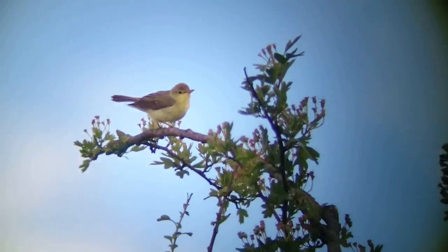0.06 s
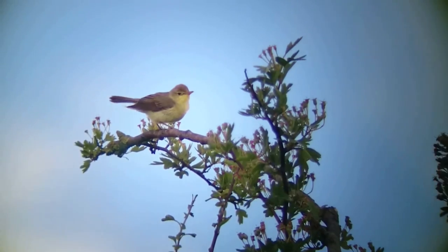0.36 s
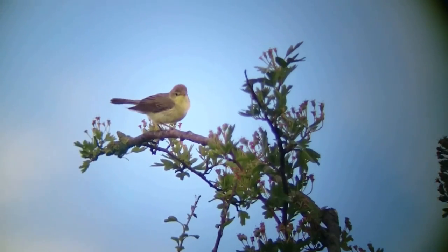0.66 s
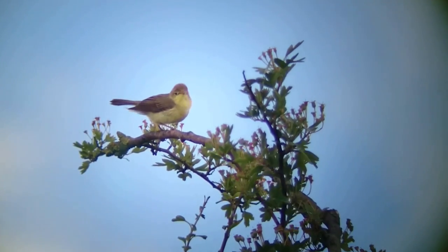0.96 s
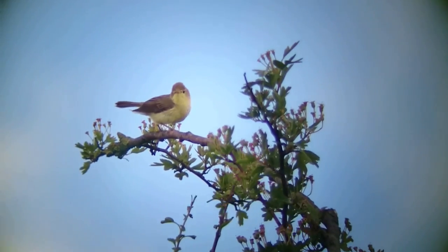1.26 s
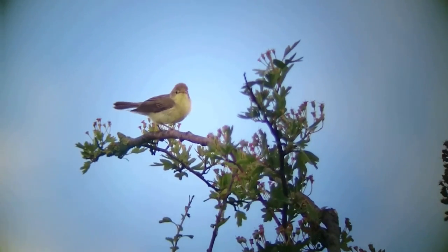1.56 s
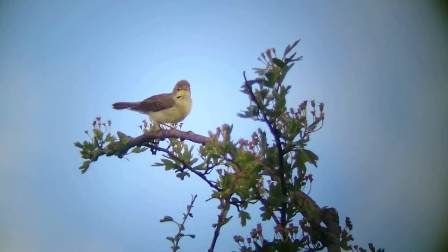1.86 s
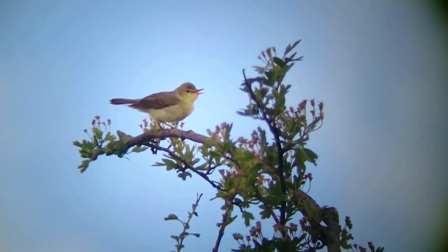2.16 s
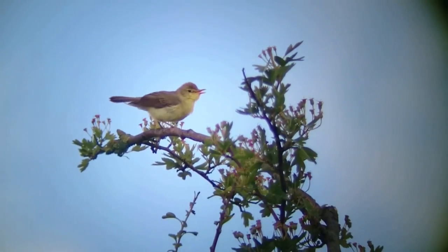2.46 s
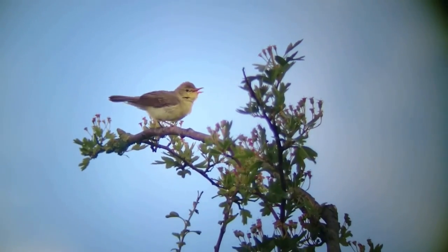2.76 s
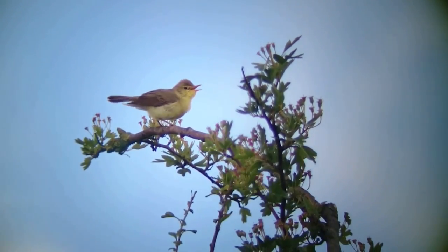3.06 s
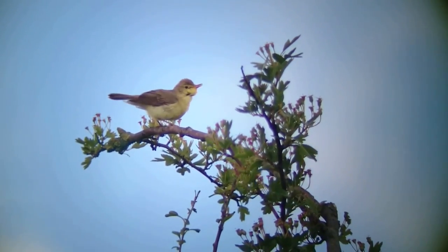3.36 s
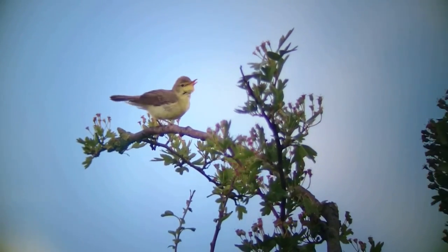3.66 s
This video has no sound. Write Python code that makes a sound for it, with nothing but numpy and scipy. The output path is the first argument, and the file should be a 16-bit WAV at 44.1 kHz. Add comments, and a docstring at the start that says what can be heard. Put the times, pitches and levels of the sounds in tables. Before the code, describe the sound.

Gusty wind rumbles on the microphone while a small bird sings faintly in open country.

```python
"""A small warbler on a bush in open country, heard through a camera's two microphone ports.
From the start, gusts buffet each port separately, brighter as they grow, over a faint hush of
land and leaves. At 0.16 s the housing clicks sharply near the right port. From 1 s the wind eases
and the bird sings softly. At 2.2 s the housing clicks again and the gusts return; the song goes on
in chips and buzzes, with arched calls at 3.2 and 3.4 s."""
import sys
import numpy as np
from scipy import signal
from scipy.fft import rfft, irfft, next_fast_len
from scipy.io import wavfile
from scipy.ndimage import uniform_filter1d, map_coordinates

SR = 44100
rng = np.random.default_rng(int(sys.argv[2]) if len(sys.argv) > 2 else 0)


def file_out(sig):
    """Save sig as 16-bit WAV at sys.argv[1]."""
    # one column per channel
    cols = np.atleast_2d(sig).T
    # limit, then scale
    lim = np.clip(cols, -1, 1)
    pcm = np.round(lim * 32767).astype(np.int16)
    wavfile.write(sys.argv[1], SR, pcm)


N = 167580

# wind strength per port: time_s, level_db
GUSTS_LEFT = [(0.03, -26), (0.12, -20.5), (0.36, -29), (0.42, -18.5), (0.74, -29), (0.78, -23), (1.02, -28),
              (1.06, -41), (1.142, -22.5), (1.4, -41), (1.46, -34), (1.84, -47), (2.45, -15.5),
              (2.53, -24.5), (2.709, -19), (2.769, -26.5), (2.93, -18), (3.01, -26.5), (3.41, -32),
              (3.61, -45), (3.65, -33), (3.8, -49)]
GUSTS_RIGHT = [(0.0, -20.5), (0.38, -24), (0.46, -26.5), (0.621, -18.5), (0.776, -23.5), (0.811, -23.5),
               (0.96, -41.5), (0.998, -25), (1.28, -39.5), (1.42, -60), (1.481, -36), (1.7, -63),
               (1.778, -27), (1.937, -49), (1.976, -27.5), (2.077, -38), (2.18, -16), (2.37, -22),
               (2.591, -17), (3.13, -31.5), (3.25, -27), (3.41, -41), (3.51, -31.5), (3.8, -31.5)]
# turbulence spectra: freq_hz, gain_db
RUMBLE_SPECTRUM = [(20, -37), (35, -16), (56, 3), (88, 4.5), (130, -7), (200, -14), (300, -28.5),
                   (500, -52.5), (1000, -79), (2000, -120)]
FLUTTER_SPECTRUM = [(40, -15), (110, 4), (200, 5), (320, -2.5), (500, -16), (800, -29), (1300, -46.5),
                    (3000, -89)]
# spectra of distant land, port hiss and leaves: freq_hz, gain_db
HUSH_SPECTRUM_LEFT = [(30, -9), (250, 2), (550, -5), (900, 2.5), (1350, -1.5), (1680, 4.5), (1950, -24.5),
                      (3000, -13.5), (6000, -22), (16000, -46.5)]
HUSH_SPECTRUM_RIGHT = [(30, 6.5), (250, -7.5), (550, -5), (800, 0), (1300, -6.5), (2200, -12.5),
                       (3500, -19.5), (6500, -22), (16000, -44)]
HISS_SPECTRUM_LEFT = [(300, 2.5), (1650, -4.5), (2100, 2.5), (3500, -0.5), (4600, -3), (5800, -9),
                      (7500, -5.5), (11000, -14), (16000, -14.5)]
HISS_SPECTRUM_RIGHT = [(300, -1), (2000, 1), (3500, 1), (5000, -14), (6500, 2), (8000, -4.5),
                       (11000, -12.5), (16000, -18)]
LEAF_SPECTRUM = [(1500, -23), (4000, 0), (7000, -0.5), (12000, -4), (16000, -10)]
# swell of land and leaves: time_s, level_db
HUSH_LEVELS = [(0, -68.5), (0.9, -65), (1.71, -70.5), (2.66, -61), (3.8, -66)]
LEAF_LEVELS = [(0, -74), (.12, -78), (.19, -66.5), (.4, -70), (.6, -82.5), (.9, -83), (1.08, -68),
               (1.3, -71.5), (1.52, -85), (2.15, -95.5), (2.22, -72.5), (2.45, -68.5), (2.7, -83),
               (3.1, -82), (3.45, -71.5), (3.8, -78)]
# eddies striking a port: centre_s, width_s, level_db, port (0 left, 1 right)
HARD_EDDIES = [(.149, 0.00069, -7, 0), (0.27, 0.0014, -13, 0), (0.28, 0.00092, -12.5, 1),
               (0.378, 0.0011, -5.5, 1), (0.439, 0.0014, -12.5, 0), (0.508, 0.00076, -16.5, 0),
               (.558, 0.001, -5.5, 1), (.619, 0.0011, -6.5, 1), (.63, .0011, -4.5, 1),
               (0.636, 0.00061, -14.5, 0), (0.655, 0.0017, 4.5, 1), (0.683, 0.0009, -7.5, 0),
               (0.715, 0.00084, -2.5, 1), (0.7259, 0.0029, 5.5, 1), (0.743, 0.0037, 2, 1),
               (0.733, 0.0012, -3.5, 0), (0.773, 0.00065, -28, 1), (.793, 0.00091, -8.5, 1),
               (0.862, 0.00092, -11, 0), (0.991, 0.001, -12.5, 0), (1.135, 0.002, -8.5, 0),
               (1.238, 0.001, -16.5, 0), (1.408, 0.00092, -33.5, 0), (1.474, 0.00086, -28, 1),
               (1.757, 0.00055, -24, 1), (1.781, 0.0017, -8.5, 1), (2.167, 0.00044, -18, 1),
               (2.175, 0.00081, -7, 1), (2.23, 0.00065, -8.5, 1), (2.238, 0.0031, 7, 1),
               (2.302, 0.0012, 2, 1), (2.378, 0.00075, -9, 0), (2.435, 0.00042, -19, 0),
               (2.461, 0.00054, -12.5, 0), (2.47, 0.00036, -10.5, 0), (2.478, 0.00054, -13, 0),
               (2.595, 0.00099, -2.5, 0), (2.632, 0.0007, -7, 1), (2.667, 0.00062, -12.5, 0),
               (2.704, 0.00066, -12.5, 0), (2.77, 0.00076, -17.5, 0), (2.83, .0011, -15, 0),
               (2.86, 0.0009, -4.5, 1), (2.912, 0.00048, -12, 0), (2.935, 0.00083, -5, 0),
               (2.944, 0.00069, -10.5, 0), (3.052, 0.001, -14, 0), (3.155, 0.001, -16, 0),
               (3.236, 0.0017, -9, 1), (3.251, 0.00095, -21, 0), (3.271, 0.0035, -3, 1),
               (3.514, 0.0015, -9.5, 1), (3.681, 0.001, -21, 0), (3.739, 0.00084, -15, 1)]
# housing clicks, the first with a rebound: start_s, ring_db, low_mode_gain_db, edge_db
HOUSING_CLICKS = [(0.1573, -22, -13, -9), (0.159, -34, 6, -40), (2.1915, -22.5, 1, -38)]
# housing resonances: freq_hz, left_db, right_db, t60_s
HOUSING_MODES = [(1790, -25.5, -33, 0.019), (2820, -37, -13, 0.0043), (3500, -27, -13.5, 0.0043),
                 (4460, -29, -35, 0.017), (6590, -39.5, -1.5, 0.0026), (7300, -40, -47, 0.00076),
                 (13600, -42.5, -2, 0.001), (14900, -39.5, -7, .0018)]
# spectra of the click's hard edge and of its tail and scuff: freq_hz, gain_db
EDGE_SPECTRUM = [(1500, -28), (4500, -22.5), (6300, -18), (8300, -3), (10000, -7.5), (11300, -4),
                 (12500, -10), (14000, -10), (16000, -12)]
SCUFF_SPECTRUM = [(3000, -21.5), (5200, -7), (6500, 0.5), (9000, -4.5), (12500, -7.5), (16000, -3)]
# scuff after the second click: time_s, level_db
SCUFF_LEVELS = [(2.195, -61), (2.235, -61.5), (2.25, -54.5), (2.275, -90)]
# song: start_s, length_s, start_hz, middle_hz, end_hz, level_db, buzz (0 pure, 1 rough)
SONG_NOTES = [(1.02, 0.25, 4670, 4500, 4480, -75, .45), (1.161, 0.09, 6900, 6730, 6360, -81, 0.31),
              (1.266, 0.118, 4620, 4540, 4430, -74.5, .35), (1.384, 0.075, 4720, 4620, 4380, -72.5, 0.88),
              (1.335, 0.065, 6600, 6270, 6080, -76, .4), (1.73, 0.053, 3770, 3450, 3450, -76, 0.46),
              (2.327, 0.027, 3760, 3760, 3800, -70, 0.042), (2.32, .03, 4980, 5000, 5000, -68, .1),
              (2.373, 0.055, 3800, 3750, 3960, -70.5, 0.1), (2.427, 0.034, 3800, 3770, 3750, -68.5, .1),
              (2.38, 0.08, 3100, 3040, 3090, -75.5, 0.44), (2.497, .025, 4400, 4450, 4700, -68, 0.8),
              (2.562, .065, 6720, 6450, 6320, -77.5, 0.4), (2.725, 0.099, 7070, 6350, 6100, -73, 0.6),
              (2.742, 0.024, 3790, 3800, 3800, -71, 0), (2.738, .025, 5000, 5000, 5000, -69, 0),
              (2.785, 0.095, 3900, 4120, 4110, -71, 0.79), (2.791, .08, 3100, 3130, 3330, -74, 0.087),
              (2.901, .011, 5800, 6440, 7140, -65.5, 0.1), (2.912, 0.012, 4130, 5410, 4640, -49.5, 0.71),
              (2.956, 0.0075, 5800, 6080, 7100, -60.5, 0.062),
              (2.965, 0.0096, 4200, 5350, 4970, -52.5, 0.65), (3.021, .016, 6100, 5300, 4560, -69, 0.004),
              (3.023, 0.095, 4450, 3960, 3450, -66.5, 1), (3.154, 0.027, 4500, 4230, 4000, -70.5, 1),
              (3.197, 0.022, 4370, 4830, 4240, -57.5, 0.45), (3.359, 0.018, 4500, 4800, 4450, -54, 0.25),
              (3.36, 0.015, 6100, 6300, 6100, -64.5, 0.7), (3.399, 0.025, 4600, 4840, 4470, -54.5, 0.3),
              (3.402, 0.031, 6060, 6300, 5970, -68, 1), (3.509, 0.0186, 4100, 3480, 3380, -67, 0.6),
              (3.709, 0.11, 2200, 2500, 3520, -83.5, 0.18)]
# falling runs of chips: start_s, count, first_hz, level_db
CHIP_RUNS = [(2.109, 4, 2950, -70), (2.536, 5, 3100, -66.5)]
# arched calls: start_s, level_db
ARCH_CALLS = [(3.229, -51), (3.43, -48.5)]
# course of one arched call: time_s, pitch_hz, level_db, buzz
ARCH_CONTOUR = [(0, 4350, -7, 0.65), (.008, 4780, -4.5, 0.4), (.027, 5400, -1, .5), (.034, 6290, -12, .2),
                (.038, 6950, -16, 0.3), (.046, 7600, -19, 0.4), (.051, 7180, -15, .7),
                (0.055, 6600, -3.5, 0.3), (.061, 5850, 0, .2), (0.077, 4860, -6, .2), (.083, 4400, -28, .2)]
# each port's colouring of the song: freq_hz, gain_db
SONG_RESPONSE_LEFT = [(2000, 14), (3100, -14), (3900, 7.5), (4900, -2.5), (5600, -12.5), (6500, -16.5),
                      (9000, -15)]
SONG_RESPONSE_RIGHT = [(2000, 21), (3100, 6.5), (3900, 0.5), (4900, -22), (5600, -1.5), (6500, 6),
                       (9000, -8)]


def amp(db):
    """Decibels to gain."""
    return 10 ** (np.asarray(db) / 20)


def unit(x):
    """Scale to rms 1."""
    return x / np.sqrt(np.mean(x ** 2) + 1e-20)


def curve(rows, outside=None):
    """One value per sample from (time_s, value) rows."""
    return np.interp(np.arange(N) / SR, *np.transpose(rows), left=outside, right=outside)


def wobble(knots_per_s):
    """Smooth random curve."""
    return map_coordinates(rng.standard_normal(8192), [np.arange(N) * knots_per_s / SR], mode="wrap")


def filtered(x, response):
    """Apply response(hz) to x."""
    size = next_fast_len(N + 8192)
    return irfft(rfft(x, size) * response(np.fft.rfftfreq(size, 1 / SR)), size)[..., :N]


def coloured(x, spectrum):
    """Filter by (freq_hz, gain_db) rows on a log frequency axis."""
    freq_hz, gain_db = np.transpose(spectrum)
    return filtered(x, lambda hz: amp(np.interp(np.log(hz + 1), np.log(freq_hz + 1), gain_db)))


def noise(spectrum):
    """Coloured noise, rms 1."""
    return unit(coloured(rng.standard_normal(N), spectrum))


def add(out, start_s, x):
    """Mix x in at start_s."""
    i = round(start_s * SR)
    out[..., i:i + x.shape[-1]] += x[..., :N - i]


def buffet(gusts, rumble_db, flutter_db, growth, rumble_lumps_db, flutter_lumps_db):
    """Turbulence on one port: lumpy rumble, plus flutter that grows faster than the wind."""
    wind_db, lumps = curve(gusts), wobble(29.97)
    rumble = noise(RUMBLE_SPECTRUM)
    running_rms = np.sqrt(np.abs(uniform_filter1d(rumble ** 2, size=2400)) + 1e-6)
    rumble = unit(rumble / running_rms * amp(rumble_lumps_db * lumps))
    flutter = unit(noise(FLUTTER_SPECTRUM) * amp(flutter_lumps_db * (lumps + wobble(110))))
    expanded_db = wind_db.max() + growth * (wind_db - wind_db.max())
    return rumble * amp(wind_db + rumble_db) + flutter * amp(expanded_db + flutter_db)


def wind():
    """Gusts buffet each port separately."""
    left = buffet(GUSTS_LEFT, rumble_db=-4, flutter_db=-9.5, growth=1.644,
                  rumble_lumps_db=4, flutter_lumps_db=3)
    right = buffet(GUSTS_RIGHT, rumble_db=1.5, flutter_db=-12.5, growth=1.9,
                   rumble_lumps_db=3.5, flutter_lumps_db=1.5)
    return np.array([left, right])


def countryside(waver_db=0.04):
    """Far hush, steady port hiss, and a high hiss that swells like stirring leaves."""
    hush = np.array([amp(6) * noise(HUSH_SPECTRUM_LEFT), amp(4) * noise(HUSH_SPECTRUM_RIGHT)])
    hiss = np.array([amp(-68) * noise(HISS_SPECTRUM_LEFT), amp(-67) * noise(HISS_SPECTRUM_RIGHT)])
    leaves = np.array([noise(LEAF_SPECTRUM), noise(LEAF_SPECTRUM)])
    hush_db = curve(HUSH_LEVELS) + waver_db * wobble(4.13)
    return hush * amp(hush_db) + hiss + leaves * amp(curve(LEAF_LEVELS))


def eddy(width_s):
    """Pressure dip of an eddy's core, centred in 50 ms."""
    t = np.linspace(-0.025, 0.025, SR // 20)
    return -np.hanning(len(t)) / np.cosh(t / width_s)


def port_response(hz, ring_hz=930, ring_q=1.77, cut_hz=70.2, cut_q=0.8, subsonic_hz=35):
    """The port's hollow rings and passes little above; its bass roll-off makes a dip rebound."""
    hollow = 1 / (1 - (hz / ring_hz) ** 2 + 1j * hz / ring_hz / ring_q)
    low_cut = -hz ** 2 / (cut_hz ** 2 - hz ** 2 + 1j * hz * cut_hz / cut_q)
    subsonic_cut = hz / (hz - 1j * subsonic_hz)
    return hollow * low_cut * subsonic_cut


def eddies(small_per_s=13, small_gain_db=5.5, min_width_s=0.00053, widen_per_db=0.7):
    """Dips on the ports: hard eddies, and small random ones that sharpen as the wind grows."""
    out, lead_s = np.zeros((2, N)), 0.025
    for centre_s, width_s, level_db, port in HARD_EDDIES:
        add(out[int(port)], centre_s - lead_s, amp(level_db) * eddy(width_s))
    for channel, gusts in zip(out, (GUSTS_LEFT, GUSTS_RIGHT)):
        wind_db = curve(gusts)
        for position, size in rng.random((int(small_per_s * N / SR), 2)):
            local_db = wind_db[int(position * N)]
            width_s = min_width_s * np.exp(widen_per_db * (wind_db.max() - local_db))
            start_s = max(position * N / SR - lead_s, 0)
            add(channel, start_s, size * amp(local_db + small_gain_db) * eddy(width_s))
    return filtered(out, port_response)


def clicks(rise_s=0.00018, low_mode_limit_hz=4000, tail_db=-29.5, tail_t60_s=0.02, edge_left_db=-22):
    """A hard edge rings the housing; a short tail and a scuff reach the right port only."""
    out, edges = np.zeros((2, N)), np.zeros(N)
    t = np.arange(SR // 20) / SR
    attack = 1 - np.exp(-t / rise_s)
    for start_s, ring_db, low_mode_gain_db, edge_db in HOUSING_CLICKS:
        ring = np.zeros((2, len(t)))
        for hz, left_db, right_db, t60_s in HOUSING_MODES:
            envelope = amp(low_mode_gain_db * (hz < low_mode_limit_hz) - 60 * t / t60_s)
            ring += np.outer(amp([left_db, right_db]), envelope * np.sin(2 * np.pi * hz * t))
        ring[1] += amp(tail_db - 60 * t / tail_t60_s) * noise(SCUFF_SPECTRUM)[:len(t)]
        add(out, start_s, 2 * amp(ring_db) * ring * attack)
        edges[round(start_s * SR)] = -amp(edge_db)
    out += np.outer([amp(edge_left_db), 1], coloured(edges, EDGE_SPECTRUM))
    out[1] += noise(SCUFF_SPECTRUM) * amp(curve(SCUFF_LEVELS, outside=-120))
    return out


def glide(pitch_hz, buzz, buzz_hz=301.4, swing_hz=260):
    """Sine of rms 1 on a pitch path, roughened by fast pitch flutter."""
    t = np.arange(len(pitch_hz)) / SR
    flutter = np.sin(2 * np.pi * buzz_hz * t) + wobble(700)[:len(t)]
    cycles = np.cumsum(pitch_hz + buzz * swing_hz * flutter) / SR
    return np.sqrt(2) * np.sin(2 * np.pi * cycles)


def whistle(length_s, start_hz, middle_hz, end_hz, buzz):
    """One note on a parabolic glide."""
    progress = np.linspace(0, 1, int(length_s * SR))
    parabola = np.polyfit([0, 0.5, 1], [start_hz, middle_hz, end_hz], 2)
    return glide(np.polyval(parabola, progress), buzz) * signal.windows.tukey(len(progress), 0.38)


def chip(pitch_hz, length_s=0.016, rise=0.044):
    """Short upward whistle."""
    return whistle(length_s, pitch_hz * (1 - rise), pitch_hz, pitch_hz * (1 + rise), buzz=0.13)


def arched_call(rasp_depth=0.41):
    """A whistle climbs, breaks at the top and swoops down; rasp adds side bands."""
    time_s, *columns = np.transpose(ARCH_CONTOUR)
    t = np.arange(int(time_s[-1] * SR)) / SR
    pitch_hz, level_db, buzz = (np.interp(t, time_s, column) for column in columns)
    tone = glide(pitch_hz, buzz) * amp(level_db)
    rasp = 1 + rasp_depth * wobble(2600)[:len(t)]
    return tone * rasp * signal.windows.tukey(len(t), 0.1)


def bush_scatter(song, t60_s=0.31, wet_db=-12):
    """Bushes add a faint tail to the song, a separate one for each port."""
    t = np.arange(SR // 2) / SR
    tails = rng.standard_normal((2, len(t))) * amp(-60 * t / t60_s)
    return [song + amp(wet_db) * signal.fftconvolve(song, tail / np.linalg.norm(tail))[:N]
            for tail in tails]


def warbler(chip_period_s=0.028, chip_pitch_ratio=0.91, chip_fade_db=5):
    """Notes, arched calls and chip runs, scattered by bushes and coloured by each port."""
    song = np.zeros(N)
    for start_s, length_s, start_hz, middle_hz, end_hz, level_db, buzz in SONG_NOTES:
        add(song, start_s, amp(level_db) * whistle(length_s, start_hz, middle_hz, end_hz, buzz))
    for start_s, level_db in ARCH_CALLS:
        add(song, start_s, amp(level_db) * arched_call())
    for start_s, count, first_hz, level_db in CHIP_RUNS:
        for k in range(round(count)):
            note = chip(first_hz * chip_pitch_ratio ** k)
            add(song, start_s + k * chip_period_s, amp(level_db - k * chip_fade_db) * note)
    left, right = bush_scatter(song)
    return np.array([coloured(left, SONG_RESPONSE_LEFT), coloured(right, SONG_RESPONSE_RIGHT)])


def scene():
    """All sources at the two ports."""
    return wind() + countryside() + warbler() + clicks() + eddies()


def record(dry):
    """The camera's band limit."""
    top_hz, fade_hz = 16100, 650
    return filtered(dry, lambda hz: np.sin(np.pi / 2 * np.clip((top_hz - hz) / fade_hz, 0, 1)) ** 2)


dry = scene()
out = record(dry)
file_out(out)
```